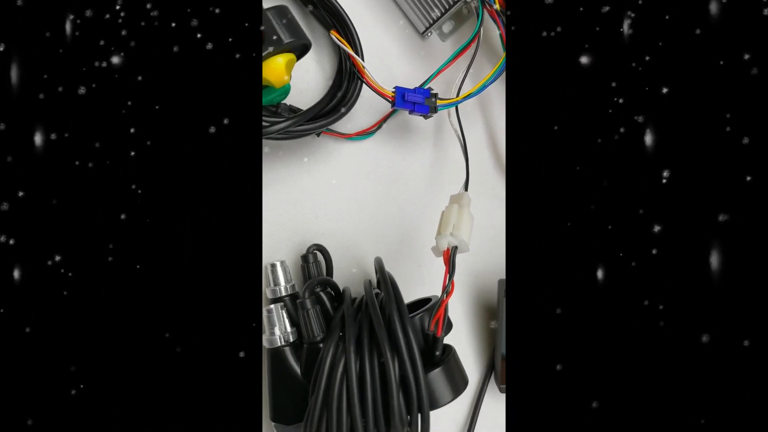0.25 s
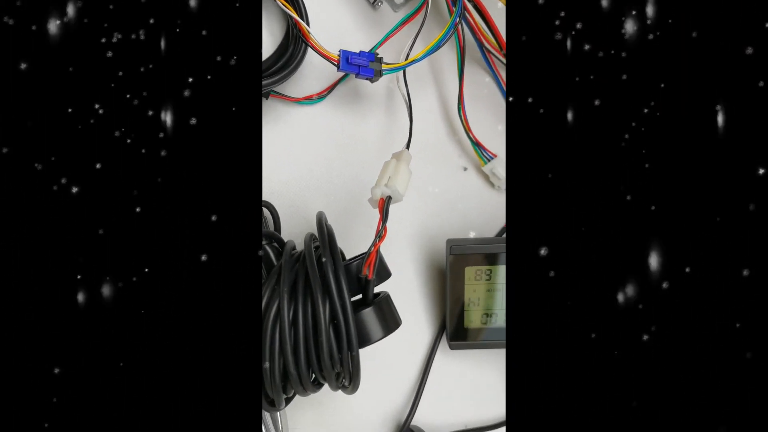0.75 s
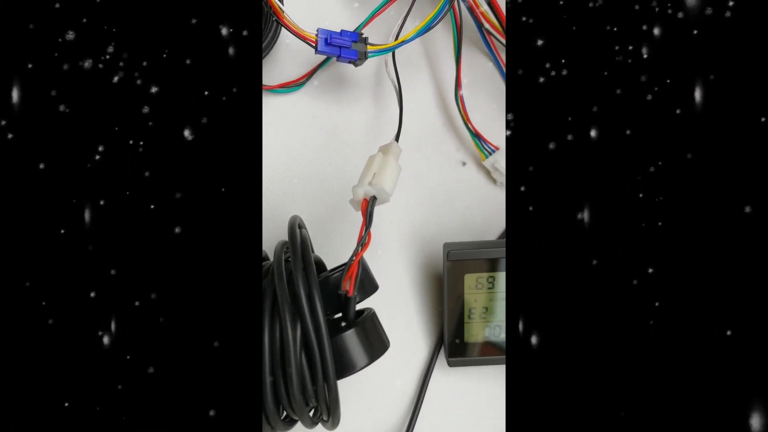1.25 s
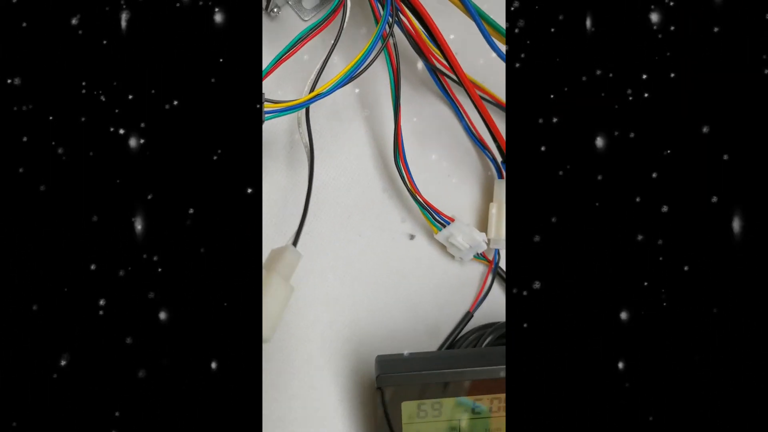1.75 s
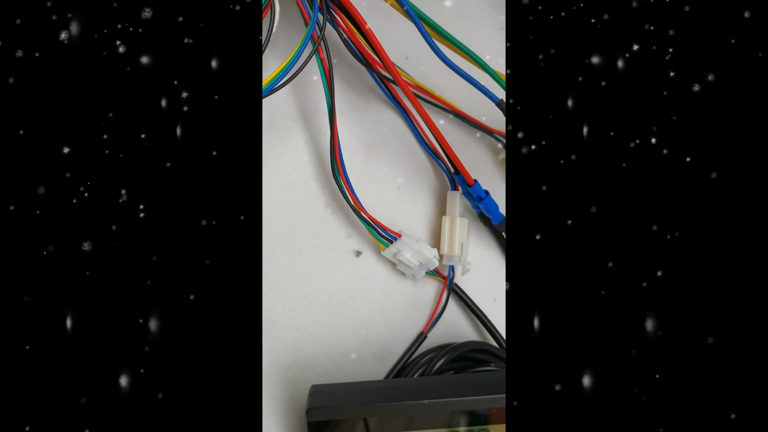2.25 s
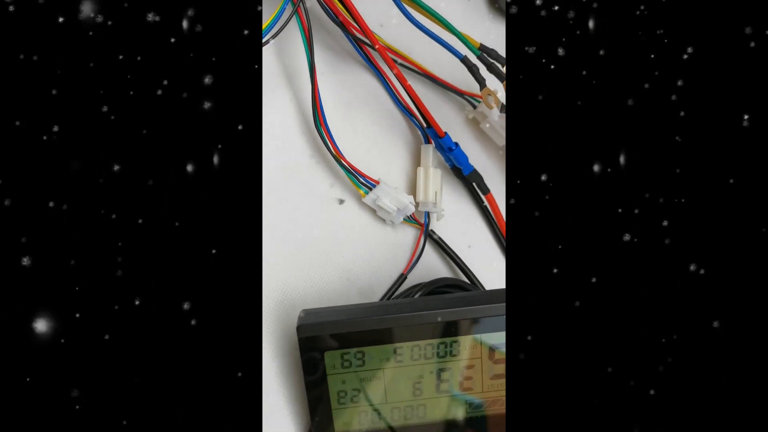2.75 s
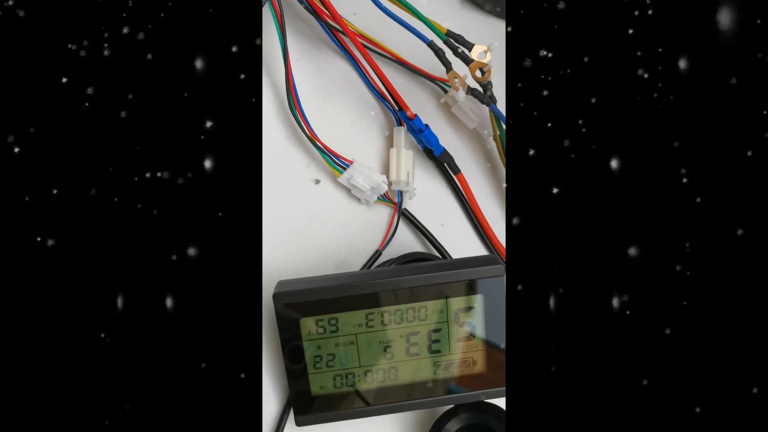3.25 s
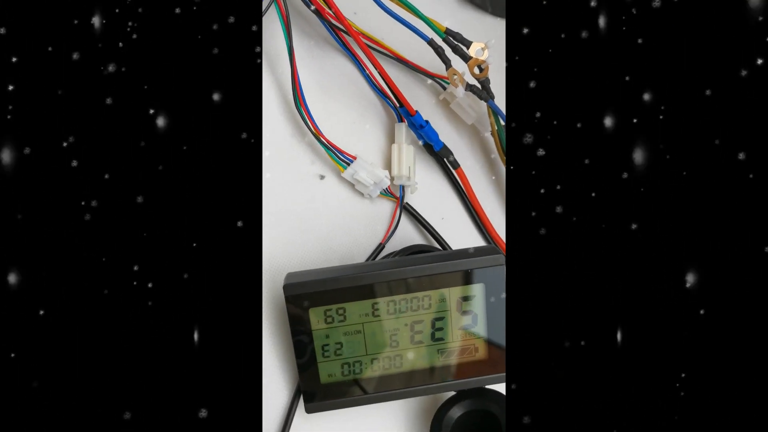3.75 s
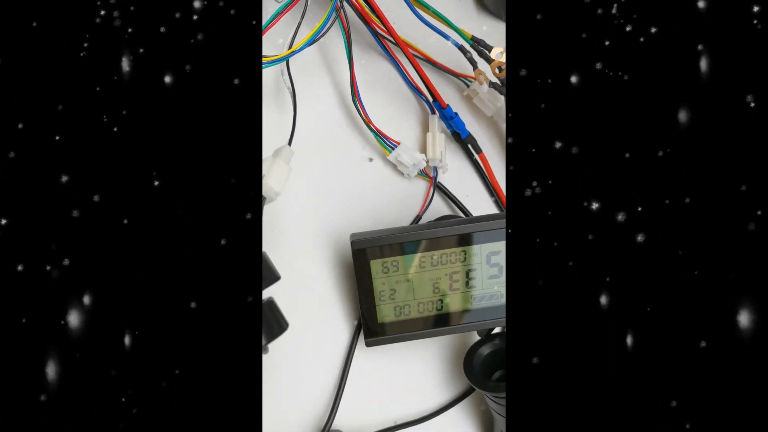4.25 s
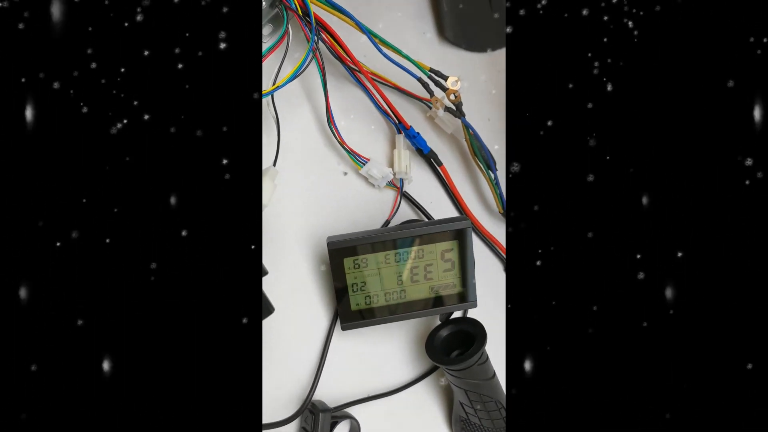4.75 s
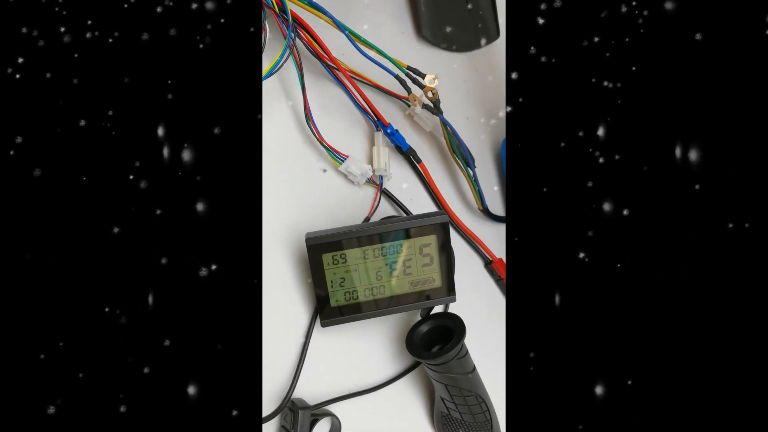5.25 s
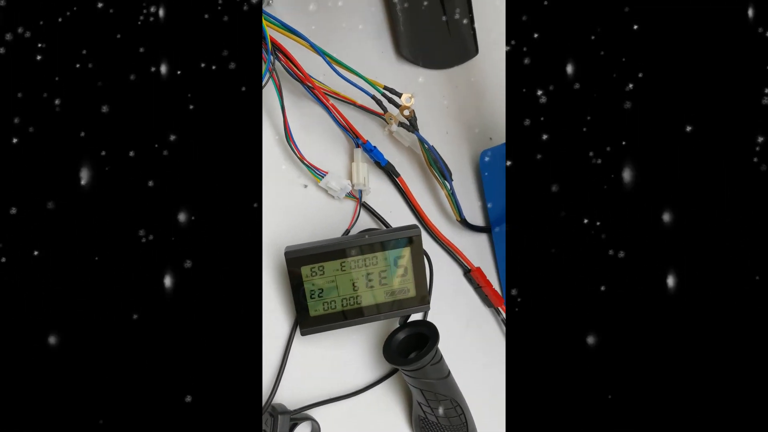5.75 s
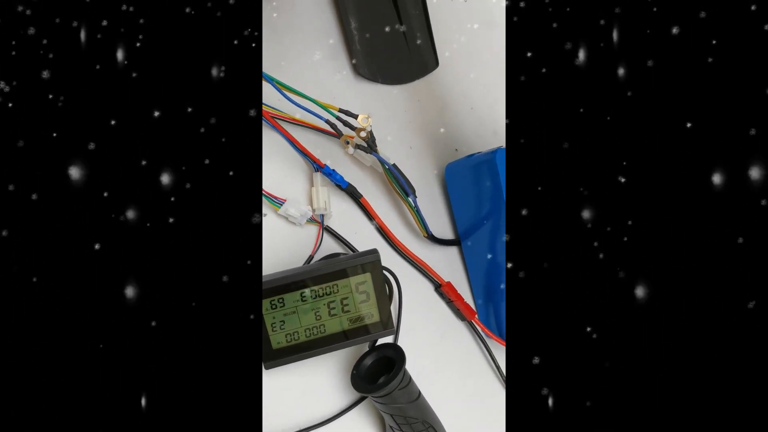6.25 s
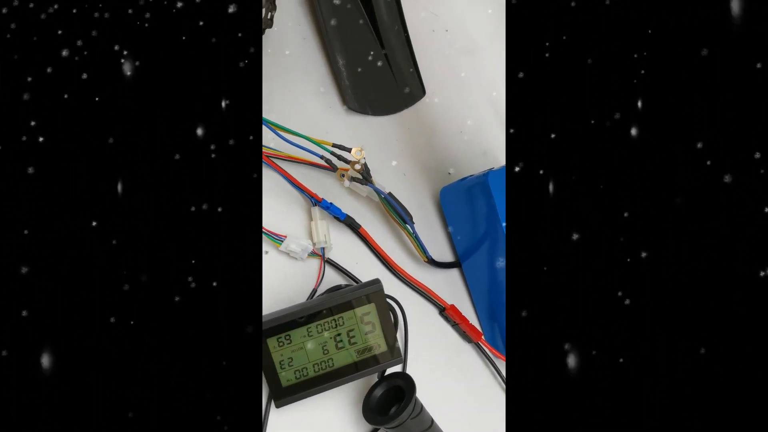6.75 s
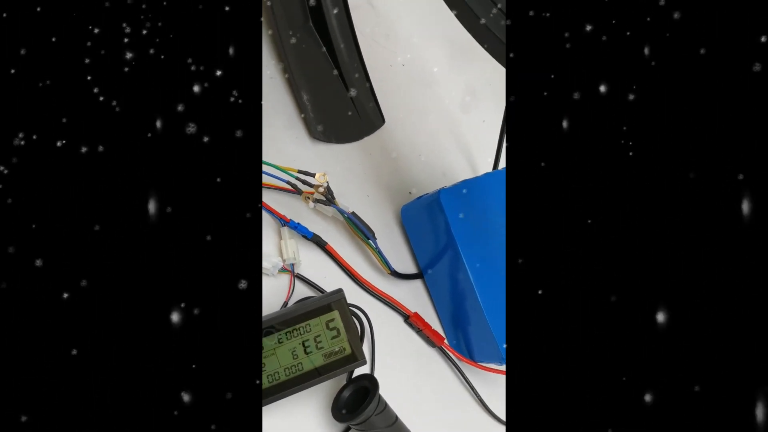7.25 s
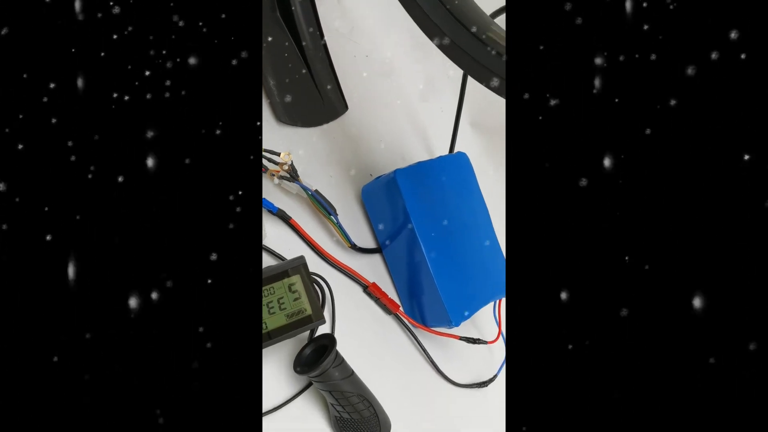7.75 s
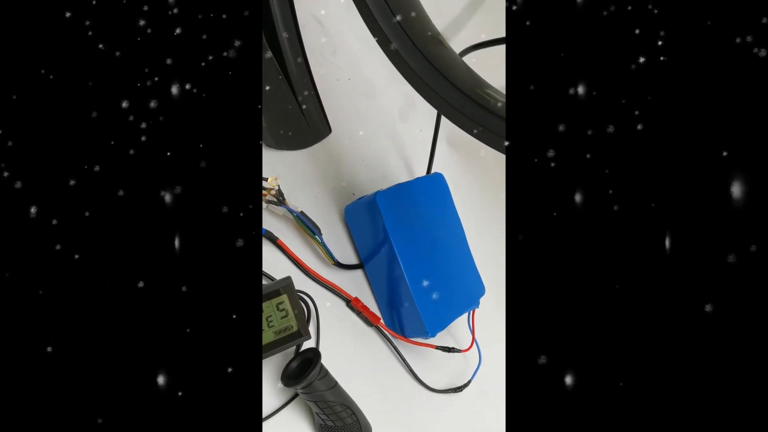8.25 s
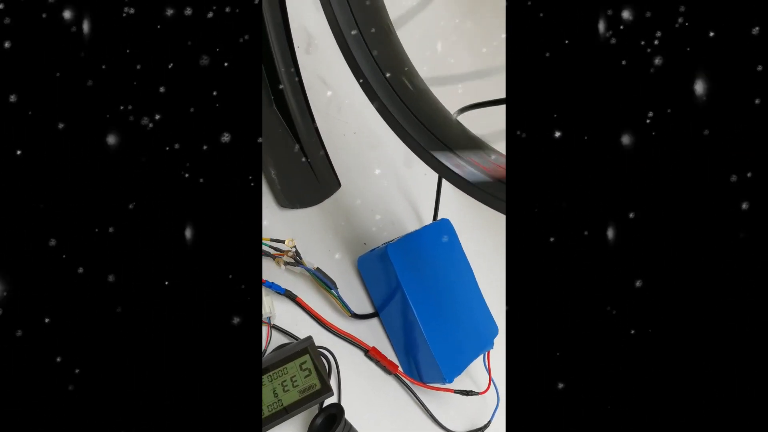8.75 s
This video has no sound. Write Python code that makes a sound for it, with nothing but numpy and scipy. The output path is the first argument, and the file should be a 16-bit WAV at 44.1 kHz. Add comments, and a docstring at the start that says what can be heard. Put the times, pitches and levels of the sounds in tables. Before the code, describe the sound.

Continuous electric motor whine, already running and never slowing, with several tones from mid to piercing high, warbling about seven times a second. Soft broadband hiss comes from the moving spokes and tyre. Deep rumble and an irregular low hum are stronger early on. Recorded indoors on a moving handheld phone, so individual tones fade and swell while the upper ringing gets brighter as it approaches.

```python
"""Nine seconds in a room: a bicycle wheel spun in the air by a gearless hub motor, on a hand-held stereo phone.
From the start the motor sings in orders of the wheel speed, most throbbing once a turn; spokes and tyre hiss as
shaped noise; a far machine hums unevenly with its octave, slowly rising, over the room's filtered-noise rumble.
After a second or so the phone drifts in, nearest at six to seven seconds, then backs off a little; tones fade or
swell as it crosses standing waves. From 1.6 s on, six faint handling ticks come as short puffs of noise."""
import sys
import numpy as np
from scipy import signal
from scipy.fft import rfft, irfft, next_fast_len
from scipy.io import wavfile
from scipy.ndimage import uniform_filter1d, map_coordinates

SR = 44100
rng = np.random.default_rng(int(sys.argv[2]) if len(sys.argv) > 2 else 0)


def dump(signal):
    """Clip the signal to [-1, 1] and save it as 16-bit WAV at the path in sys.argv[1]."""
    limited = np.clip(np.atleast_2d(signal).T, -1, 1)
    pcm = np.round(limited * 32767).astype(np.int16)
    wavfile.write(sys.argv[1], SR, pcm)


N = 397341

TURN = np.arange(2 ** 15) / 2 ** 15  # wheel angles, in turns
MAGNETS = 46  # the stator has 51 slots; tone orders such as 92 and 153 are multiples of these counts

# Wheel speed. Each row: time in seconds, turns a second.
WHEEL_SPEED = [(0, 7.4165), (9.01, 7.41335)]
# How near the phone is to the wheel. Each row: time in seconds, nearness (0 far, about 1 near).
NEARNESS = [(0, 0.04), (1.2, 0), (2.5, 0.23), (3.7, 0.26), (4.6, 0.4), (5.8, 1), (6.9, 1.05), (8, 0.78),
            (9.01, 0.87)]
# Swings of the wheel's hiss as the phone turns. Each row: time in seconds, level in dB before HISS_DB is added.
PHONE_TURN_LEVEL = [(0.0, -42.5), (0.22, -41.5), (1.45, -42), (1.78, -40.5), (3.26, -42.5), (3.76, -45),
                    (4.44, -41), (5.62, -40), (6.4, -44), (7.43, -42), (8.58, -41.5), (9.01, -40)]
HISS_DB = 8.5
FOLLOWS = 0.24  # share of those swings, in dB, that the motor tones make too

# Motor orders close together, sounding as one tone. Each row: order, relative level in dB.
CLOSE_ORDERS = [(180, -22.5), (181, 0.5), (183, -11), (184, -10), (185, -2.5), (186, -9.5), (187, 0.5)]
# Faint steady motor orders. Each row: order, rms level in dB.
FAINT_ORDERS = [(350, -61), (355, -64), (359, -58), (364, -61), (368, -59), (506, -62), (1012, -64),
                (1058, -65), (1325, -66), (1334, -64), (1343, -63), (1352, -62)]
# Tones that bend and swell over a turn: orders 92, 102 (two swells, then an upward slide), 153 and 460.
# Each row: part of a turn, order, relative level in dB.
BENDING_TONES = [
    [(.11, 92, -20), (.2, 92, -9), (.3, 92, -4), (.37, 91.5, -8), (.46, 90, -18), (.56, 94, -3),
     (.66, 94, -1), (.76, 94, -5), (.85, 97, -18), (.97, 92, -2), (1.11, 92, -20)],
    [(.3, 99, -25), (.39, 100.5, -7), (.5, 101.5, -3), (.58, 102, 0), (.65, 102, -1), (.71, 102.5, -7),
     (.77, 102.5, -22), (1.3, 102.5, -90)],
    [(.3, 99, -60), (.39, 100.5, -60), (.5, 101.5, -50), (.58, 102, -40), (.65, 102, -26),
     (.71, 102.5, -14), (.77, 102.5, -5), (.83, 102.5, 0), (.9, 102.5, 0), (.96, 102.5, -6),
     (1.02, 103, -25), (1.3, 103, -90)],
    [(.94, 103, -22), (1.0, 105, -5), (1.05, 110, 0), (1.08, 116, -1), (1.11, 123, -11), (1.15, 142, -20),
     (1.2, 168, -19), (1.25, 192, -28), (1.94, 192, -90)],
    [(.05, 153, -16), (.13, 154, -9), (.21, 154, 0), (.3, 153, -6), (.4, 152, -14), (.55, 155, -14),
     (.72, 152.5, -6), (.85, 152, -11), (1.05, 152, -16)],
    [(.6, 460, -12), (.75, 460, -10), (.95, 460.5, -7), (1.08, 460.5, -2), (1.25, 460.5, 0),
     (1.42, 460.5, -2), (1.52, 460, -6), (1.6, 460, -12)],
]
# Case resonances. Each row: centre order, width in orders, crowd level in dB under the clear orders,
# list of clear orders, swell in dB, part of the turn when loudest.
CASE_RINGS = [(781, 13, -9, [769, 774, 782, 790], 1, .14), (998, 9, -15, [993], 3.5, .31),
              (1192, 20, -5, [1175, 1187, 1193, 1196, 1205], 2.5, .33), (1394, 12, -4, [1392, 1397],
              3, .18)]
# Balance of each motor tone by name. Each row: level alike at both ports far off in dB, the same near in dB,
# level opposed at the ports far off in dB, the same near in dB, lead of the opposed part in radians.
TONE_BALANCE = {"order 92": (-50, -45, -56, -43.5, 1.5), "first swell": (-46, -40.5, -49.5, -41.5, 1),
                "second swell": (-46, -46, -58, -48, 1.7), "slide": (-50.5, -48, -55, -45.5, 1.5),
                "order 138": (-54.5, -63.5, -67, -69, 2), "order 153": (-45, -53.5, -43, -43.5, 2),
                "pair": (-43, -44.5, -40, -45.5, 2), "order 414": (-43, -42.5, -50, -42.5, 1.1),
                "order 460": (-48.5, -45, -50, -44, 0.6), "ring 5.8 kHz": (-52, -45.5, -48, -46, 1.5),
                "ring 7.4 kHz": (-62, -46, -59, -46, -1), "ring 8.9 kHz": (-50.5, -45.5, -50, -44, -1),
                "ring 10 kHz": (-54.5, -51, -53, -50, -1)}
# Standing waves that the phone crosses. Each row: tone name, start in seconds, end in seconds,
# change of the alike level in dB, change of the opposed level in dB.
STANDING_WAVES = [("order 414", 1.67, 3.88, -24, -15), ("order 414", 0.93, 1.6, -0.4, -5),
                  ("order 414", 8.5, 10, 0.78, -9), ("first swell", 1.6, 3.74, -7, 1.5),
                  ("order 92", 1.2, 3.5, -4.5, .6), ("order 92", 5.9, 7.6, 3.3, -.6),
                  ("pair", 1, 1.5, -11, -2.5), ("pair", 2.5, 4.3, -2.5, .6), ("pair", 4.55, 6.9, 3.3, -1.5),
                  ("order 138", 1.8, 2.6, 3.8, .6), ("order 153", 7.5, 9.3, -.6, -15),
                  ("order 460", 1.6, 3.7, -1.5, -17), ("order 460", 8.8, 11, 5.3, .6),
                  ("ring 7.4 kHz", 8.03, 9.3, -12, -7), ("ring 5.8 kHz", 1.2, 3.7, 1.8, .6),
                  ("ring 5.8 kHz", 5.1, 6.4, -6, -3), ("second swell", 4.4, 7.1, 1.8, .6),
                  ("slide", 0.43, 0.87, 4.5, .6), ("second swell", 6.9, 9, -2.5, .6),
                  ("slide", 7.3, 9.3, -3, -1.5), ("order 92", 7.6, 9.3, -3, .6), ("pair", 0, 1.1, -1.5, .6),
                  ("ring 5.8 kHz", 4.3, 4.9, 2.5, .6), ("order 153", 4.6, 7.7, -1, .6),
                  ("pair", 7.8, 9.3, -2.9, .6), ("ring 8.9 kHz", 8.6, 9.3, 2.3, .6)]
CROSS_EDGE_S = 0.44
SLIP = 3.1  # radians the second swell falls out of step at nearness 1, breaking the tone into beads

# Spectra of the moving air, before overall level. Each row: frequency in Hz, relative density in dB per Hz.
HISS_SHAPE = [(1060, -27), (1800, -9), (2260, -9), (3240, -3), (3620, -4), (5840, -4.5), (7500, -4.5),
              (8710, -9), (9450, -11.5), (10200, -14.5), (11500, -17), (13500, -48)]
WHOOSH_SHAPE = [(450, -23), (600, -6.5), (760, -2), (950, -8.5), (1200, -4), (1450, -1.5), (1900, -5),
                (2600, -11.5), (4000, -35)]
SHEEN_SHAPE = [(7000, -42), (10000, 2), (11500, -3), (13500, -1), (15800, -10)]
WHOOSH_FAR_DB, WHOOSH_NEAR_DB = -3, -3.5  # relative to the hiss
SHEEN_FAR_DB, SHEEN_NEAR_DB = -11.5, -10  # relative to the hiss

# Spectra of four rumble layers, low to high. Each row: frequency in Hz, relative density in dB per Hz.
RUMBLE_SHAPES = [
    [(15, -40), (25, -20), (48, -4.5), (80, -1), (120, -2.5), (170, -4), (210, -14), (300, -56)],
    [(140, -37), (185, -4.5), (220, -3), (260, -8.5), (290, -10.5), (400, -52)],
    [(240, -40), (285, -12.5), (305, 0), (325, -5), (360, -3.5), (400, -18), (500, -60)],
    [(300, -42), (370, -5.5), (420, -5), (520, -2.5), (640, -4.5), (800, -31), (1300, -60)],
]
# Levels of those layers as the phone leaves the wall. Each row: first dB, last dB, rms random swing in dB.
RUMBLE_LEVELS = [(-43, -47.5, 2), (-48, -58.5, 1), (-50, -59, 1), (-51.5, -50, 2)]
# Modes of the room. Each row: frequency in Hz, width in Hz, relative level in dB.
ROOM_MODES = [(48.1, 3.4, -57), (60.9, 2.1, -50.5), (113.9, 2.8, -46.5)]

# Pitch of the far machine's hum. Each row: time in seconds, frequency in Hz.
HUM_PITCH = [(0, 70.7), (1.4, 71), (1.8, 72.6), (3.9, 72.1), (4.7, 74), (5.7, 73.5), (6.3, 74.6),
             (9.01, 74.7)]
# Uneven hum level, before the balance of the ports. Each row: time in seconds, rms level in dB.
HUM_LEVEL = [(0.0, -36), (0.15, -28), (0.85, -37), (0.93, -40), (1.3, -30), (1.45, -37), (1.5, -59),
             (1.65, -31.5), (2.26, -46), (2.28, -57), (2.46, -33.5), (2.66, -43.5), (2.88, -35),
             (3.51, -40), (3.56, -47), (3.81, -37), (4.01, -66), (4.12, -42), (4.54, -54), (4.64, -42),
             (4.87, -43), (4.97, -55), (5.07, -38), (5.27, -38), (5.37, -51.5), (5.47, -41), (5.64, -32.5),
             (6.55, -50.5), (6.85, -40.5), (7.53, -49.5), (7.75, -41), (7.93, -52), (8.13, -43),
             (8.48, -48), (8.93, -43), (9.01, -47)]
# Level of the hum's octave, before the balance of the ports. Each row: time in seconds, rms level in dB.
OCTAVE_LEVEL = [(0, -50), (.2, -40), (.75, -40.5), (.95, -52), (5, -53.5), (8.3, -55.5), (8.6, -47.5),
                (9.01, -47)]
OCTAVE_SWING_DB = 2.5

# Handling noises. Each row: start in seconds, level in dB before the puff's envelope, pitch in Hz.
HANDLING_TICKS = [(1.56, -34, 8930), (2.179, -31, 6550), (3.995, -35, 3560), (5.985, -31, 11800),
                  (6.11, -28, 280), (8.8, -38, 12990)]

# Likeness of the noise at the two microphone ports. Each row: frequency in Hz, likeness 0-1.
PORT_LIKENESS = [(40, 0.96), (130, 0.75), (290, 0.69), (640, 0.41), (1400, 0.26), (3000, 0.21),
                 (6000, 0.017), (15000, 0.052)]
# Lead of the left port in the shared noise. Each row: frequency in Hz, lead in radians.
LEFT_LEAD = [(0, 0), (260, -0.0), (600, 1.1), (860, 1.2), (1120, 2.5), (1980, -1.7), (2840, -0.8),
             (3100, 0.9), (3960, 4.4), (6720, 3.0), (7410, 2.2), (10200, 3.1), (13200, 3.1), (15400, 5.0)]
# Noise balance of the ports. Each row: frequency in Hz, left over right in dB.
LEFT_OVER_RIGHT = [(60, -7.5), (110, -1), (200, -6.5), (380, -2.5), (700, -1), (1290, -3), (2380, -3),
                   (4400, -1.5), (8120, 1.5), (15000, -4)]
TOP_HZ = 15800


def amp(db):
    """Amplitude ratio of a level in dB."""
    return 10 ** (np.asarray(db) / 20)


def unit(x):
    """x scaled to rms 1."""
    return x / np.sqrt(np.mean(np.abs(x) ** 2) + 1e-20)


def along(points, hz):
    """Values at hz from (Hz, value) points, joined on a log axis."""
    f, value = np.transpose(points)
    return np.interp(np.log(hz + 1), np.log(f + 1), value)


def curves(rows, at=None):
    """Each column after the first, joined up at every sample or at the given positions."""
    positions, *columns = np.transpose(rows)
    if at is None:
        at = np.arange(N) / SR
    return [np.interp(at, positions, column) for column in columns]


def wobble(rate):
    """A smooth random curve of about unit size, rate knots a second."""
    knots = rng.standard_normal(int(N * rate / SR) + 4)
    return map_coordinates(knots, [np.arange(N) * rate / SR])


def between(far, near):
    """A value that moves from far to near with the phone."""
    return far + (near - far) * curves(NEARNESS)[0]


def filtered(x, response):
    """x times a complex response of frequency."""
    m = next_fast_len(N + SR // 2)
    return irfft(rfft(x, m) * response(np.fft.rfftfreq(m, 1 / SR)), m)[..., :N]


def rush(colour, patchy_db):
    """Coloured noise of rms 1 with random patches in time and pitch, partly shared by the two ports."""
    spectra = signal.stft(rng.standard_normal((2, N)), nperseg=512)[2]
    patches = uniform_filter1d(rng.standard_normal(spectra.shape[1:]), 8, 0)
    patches = unit(uniform_filter1d(patches, 10, 1))
    common, separate = signal.istft(spectra * amp(patchy_db * patches), nperseg=512)[1][:, :N]

    def likeness(hz):
        return np.clip(along(PORT_LIKENESS, hz), 0, 1)

    def left_colour(hz):
        return colour(hz) * amp(along(LEFT_OVER_RIGHT, hz) / 2)

    def right_colour(hz):
        return colour(hz) * amp(-along(LEFT_OVER_RIGHT, hz) / 2)

    left = filtered(common, left_colour)
    shared = filtered(common, lambda hz: right_colour(hz) * likeness(hz) * np.exp(-1j * along(LEFT_LEAD, hz)))
    own = filtered(separate, lambda hz: right_colour(hz) * np.sqrt(1 - likeness(hz) ** 2))
    return unit(np.array([left, shared + own]))


def shaped_rush(shape, patchy_db):
    """Noise of rms 1 coloured by a table of (Hz, dB per Hz)."""
    return rush(lambda hz: amp(along(shape, hz)), patchy_db)


def orders(table):
    """One turn of a sum of whole multiples of the wheel speed, as a complex tone."""
    lines = np.zeros(len(TURN), complex)
    for order, db in table:
        lines[round(order)] = amp(db) * np.exp(2j * np.pi * rng.random())
    return np.fft.ifft(lines, norm="forward")


def bending_tone(table):
    """One turn of a tone that bends and swells, starting afresh at the same wheel angle."""
    start = table[0][0]
    order, db = curves(table, start + TURN)
    phase = 2 * np.pi * np.cumsum(order) / len(TURN)
    return np.roll(amp(db) * np.exp(1j * phase), round(start * len(TURN)))


def case_ring(centre, width, crowd_db, clear, swell_db, facing):
    """A case resonance picks up the orders within it, at uneven strengths, and faces the phone once a turn."""
    crowd = []
    for order in range(centre - 2 * width, centre + 2 * width):
        db = crowd_db - 6 * ((order - centre) / width) ** 2 + rng.normal(0, 3)
        crowd.append((order, db))
    swell = amp(swell_db * np.cos(2 * np.pi * (TURN - facing)))
    return swell * orders(crowd + [(order, 0) for order in clear])


def standing_waves(name):
    """dB that the standing waves add to one tone, alike and opposed at the ports, as the phone crosses them."""
    t, db = np.arange(N) / SR, np.zeros((2, N))
    for tone, start, end, *change in STANDING_WAVES:
        if tone == name:
            inside = np.clip(np.minimum(t - start, end - t) / CROSS_EDGE_S + .5, 0, 1)
            db += np.outer(change, inside)
    return db


def wheel_turns():
    """Turns made so far by the wheel, its speed wavering very slightly."""
    return np.cumsum(curves(WHEEL_SPEED)[0] * (1 + 0.000154 * wobble(3))) / SR


def motor(turns):
    """Magnet and slot orders, locked to the wheel angle, some swelling each turn, some ringing the case."""
    angle = (turns % 1 * len(TURN)).astype(int)
    pole, swell, second_swell, slide, third_slot, tenth_pole = map(bending_tone, BENDING_TONES)
    # in the order of TONE_BALANCE
    tones = [pole, swell, second_swell, slide, orders([(138, 0)]), third_slot,
             orders(CLOSE_ORDERS), orders([(414, 0)]), tenth_pole]
    tones += [case_ring(*row) for row in CASE_RINGS]
    phone_db, = curves(PHONE_TURN_LEVEL)
    shared_db = FOLLOWS * (phone_db - phone_db.mean())
    out = np.array([orders(FAINT_ORDERS), orders(FAINT_ORDERS)])[:, angle]
    for tone, (name, balance) in zip(tones, TONE_BALANCE.items()):
        far, near, opposed_far, opposed_near, lead = balance
        crossing_alike, crossing_opposed = standing_waves(name)
        alike = amp(between(far, near) + crossing_alike)
        opposed = amp(between(opposed_far, opposed_near) + crossing_opposed)
        opposed = opposed * np.exp(1j * (lead + .9 * wobble(4)))
        level = amp(shared_db + 1.28 * wobble(7) + 0.69 * wobble(1.505))
        if name == "second swell":
            level = level * np.exp(1j * between(0, SLIP))
        out += unit(tone)[angle] * level * (alike + [opposed, -opposed])
    return np.sqrt(2) * out.real  # sqrt 2 makes the real part's rms the stated level


def wheel_air(turns):
    """Spokes and tyre stir the air: hiss, top sheen and lower whoosh flutter and swell a little once a turn."""
    flutter_db = .5 * wobble(9) + 0.37 * wobble(30)
    turn_db = 0.1 * np.cos(2 * np.pi * (turns - .3))
    hiss_db = curves(PHONE_TURN_LEVEL)[0] + HISS_DB + flutter_db + turn_db
    sheen_db = hiss_db + between(SHEEN_FAR_DB, SHEEN_NEAR_DB)
    whoosh_db = hiss_db + between(WHOOSH_FAR_DB, WHOOSH_NEAR_DB)
    hiss = amp(hiss_db) * shaped_rush(HISS_SHAPE, patchy_db=0.64)
    sheen = amp(sheen_db) * shaped_rush(SHEEN_SHAPE, patchy_db=2.0)
    whoosh = amp(whoosh_db) * shaped_rush(WHOOSH_SHAPE, patchy_db=0.5)
    return hiss + sheen + whoosh


def room_modes():
    """The room's low resonances, each a band-pass peak on noise."""
    def response(f):
        return sum(amp(db) / np.sqrt(width) * 1j * f * width / (centre ** 2 - f * f + 1j * f * width)
                   for centre, width, db in ROOM_MODES)
    return amp(-51.5) * rush(response, patchy_db=0.5)


def rumble_and_magnets(turns):
    """Four layers of room rumble drift in level; the magnet-rate tone follows the third."""
    levels_db = [np.linspace(first, last, N) + swing * wobble(3.7) for first, last, swing in RUMBLE_LEVELS]
    rumble = sum(amp(db) * shaped_rush(shape, patchy_db=1.5) for db, shape in zip(levels_db, RUMBLE_SHAPES))
    magnets = amp(levels_db[2] - 3.5) * np.sin(2 * np.pi * MAGNETS * turns)
    return rumble + magnets


def far_machine_hum():
    """A wavering low sine with its octave, stronger at the right port."""
    phase = 2 * np.pi * np.cumsum(curves(HUM_PITCH)[0] + .7 * wobble(5)) / SR
    octave_db = curves(OCTAVE_LEVEL)[0] + OCTAVE_SWING_DB * wobble(8)
    octave = amp(octave_db) * np.sin(2 * phase + 0.67 * wobble(4.6))
    tone = amp(curves(HUM_LEVEL)[0] + 1.2 * wobble(14)) * np.sin(phase)
    return np.sqrt(2) * (tone + octave) * amp([[-2.8], [2.2]])  # left, right dB


def handling_ticks():
    """Handling the phone gives short puffs of band-passed noise, quick to rise and gone in 50 ms."""
    out, t = np.zeros((2, N + SR)), np.arange(SR // 20) / SR
    envelope_db = -60 * t / .05
    rise = 1 - np.exp(-t / 0.0025)
    for start, db, hz in HANDLING_TICKS:
        band = signal.butter(2, [hz / 1.1, min(hz * 1.05, 18000)], "band", fs=SR)
        puff = unit(signal.lfilter(*band, rng.standard_normal((2, len(t)))))
        first = round(start * SR)
        out[:, first:first + len(t)] += amp(db + envelope_db) * rise * puff
    return out[:, :N]


def scene():
    """Wheel, room, far hum and handling together, left and right."""
    turns = wheel_turns()
    wheel = motor(turns) + wheel_air(turns)
    room = rumble_and_magnets(turns) + room_modes()
    return wheel + room + far_machine_hum() + handling_ticks()


def record(dry):
    """The phone keeps nothing above its band limit."""
    return filtered(dry, lambda hz: hz < TOP_HZ)


dry = scene()
out = record(dry)
dump(out)
```